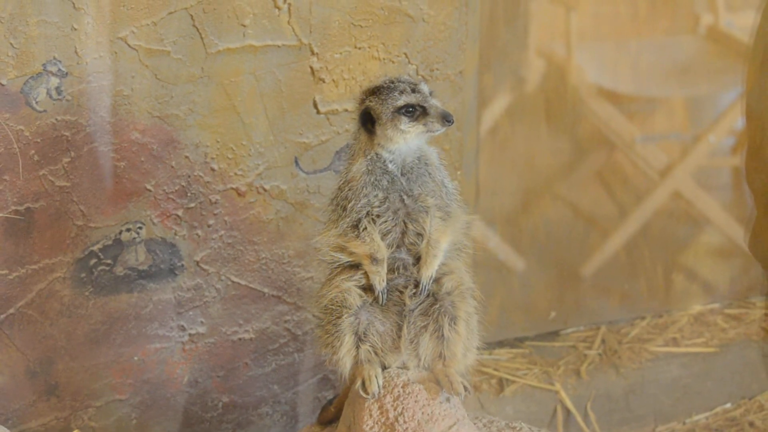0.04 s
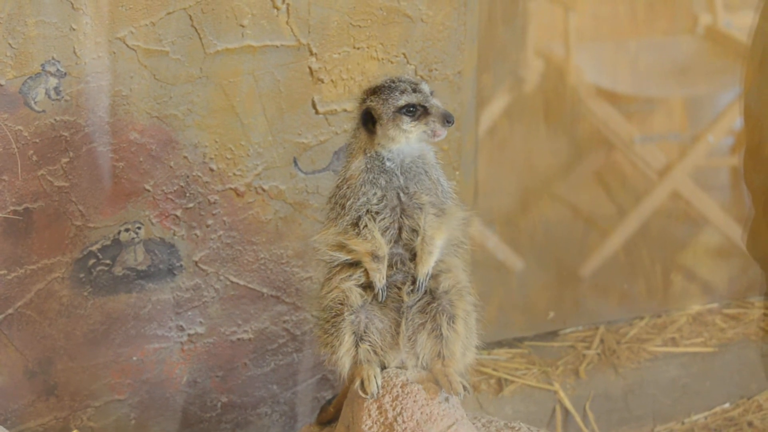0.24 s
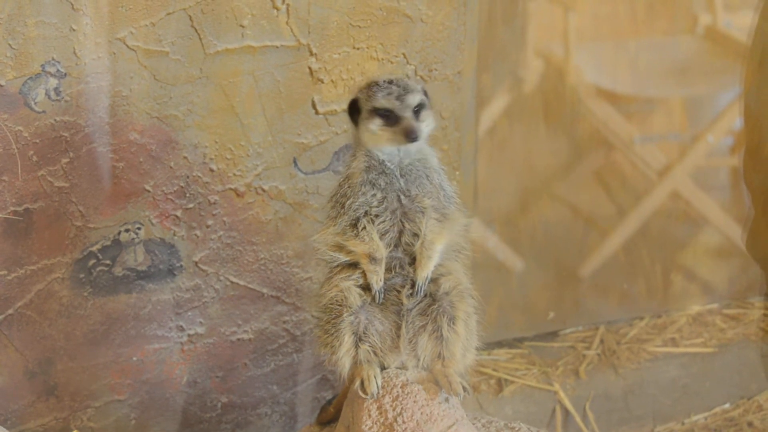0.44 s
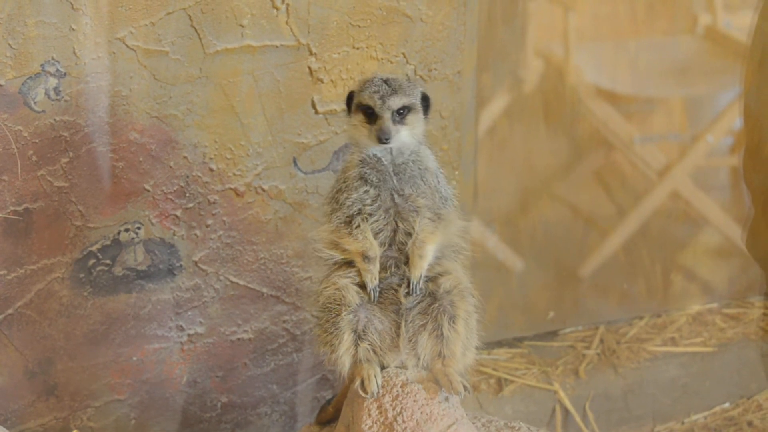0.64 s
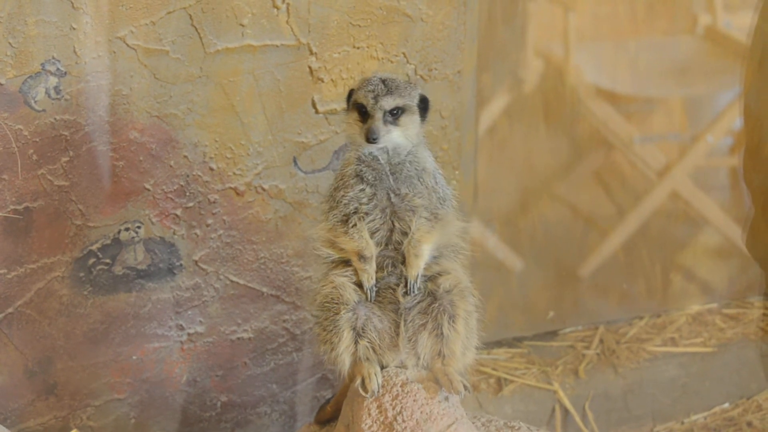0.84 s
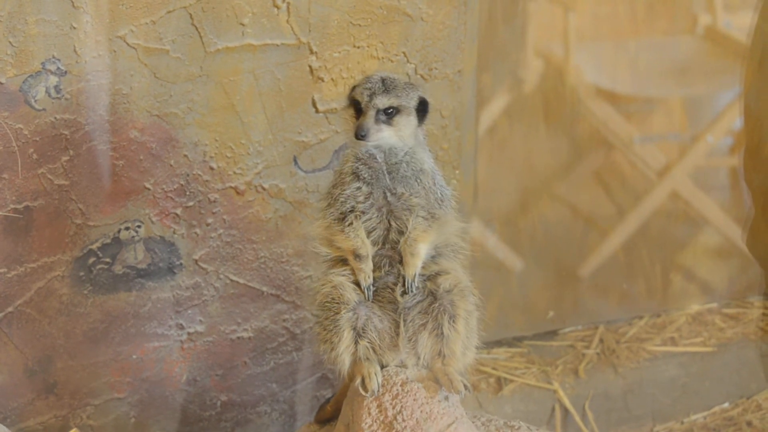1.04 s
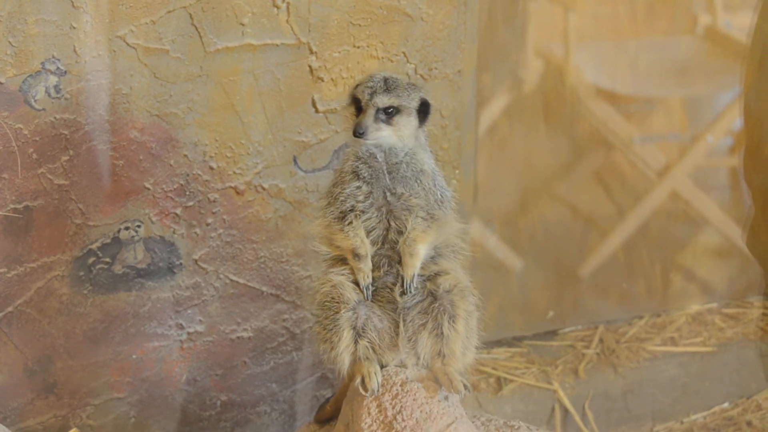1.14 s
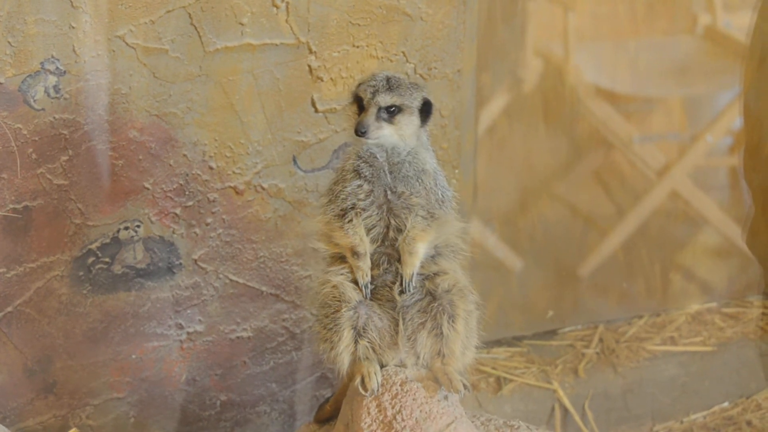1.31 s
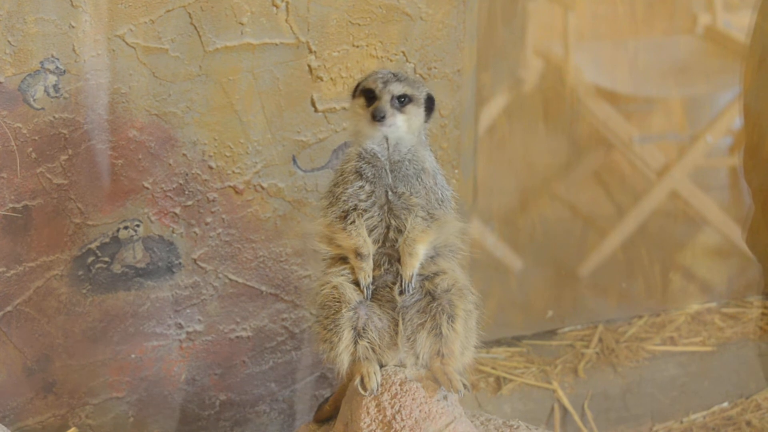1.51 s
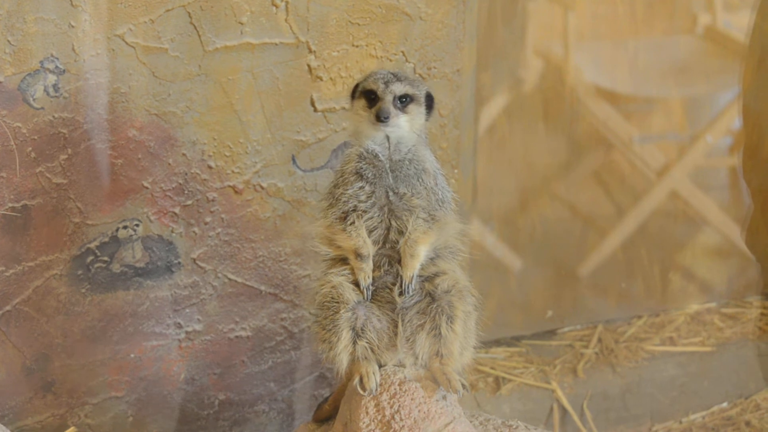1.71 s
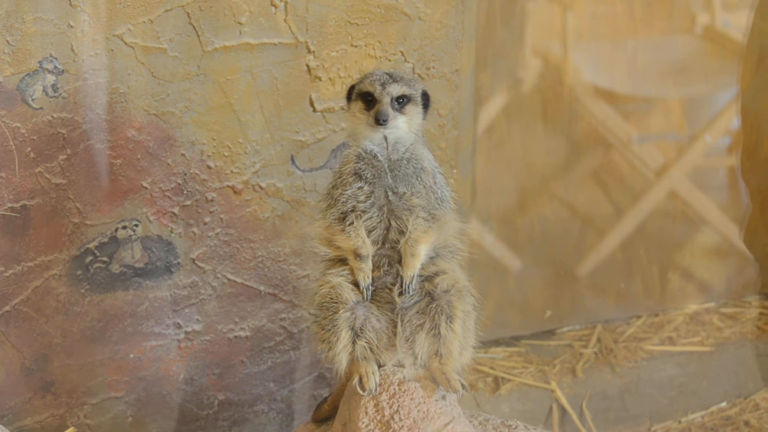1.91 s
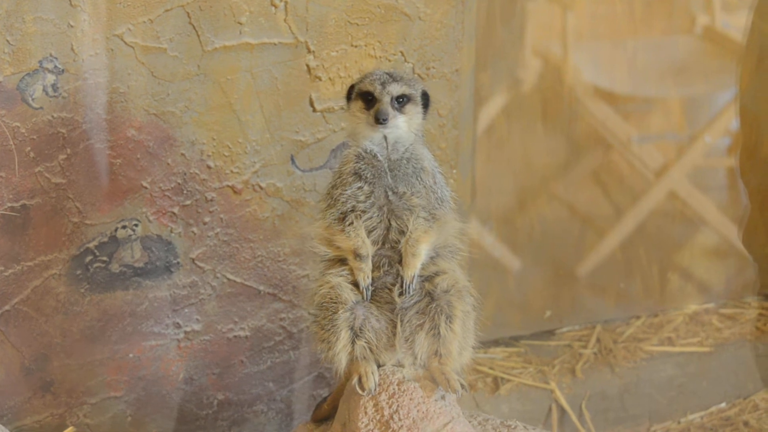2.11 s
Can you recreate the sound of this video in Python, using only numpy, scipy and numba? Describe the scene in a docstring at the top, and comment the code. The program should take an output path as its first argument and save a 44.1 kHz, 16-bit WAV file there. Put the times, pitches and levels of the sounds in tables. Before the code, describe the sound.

A meerkat gives two short, hoarse barks about a second apart, each echoing briefly off the hard walls of its enclosure. Faint air noise and a low hum continue underneath, and a tiny click falls in the second bark.

```python
"""Two hoarse barks ring out over steady air noise and a low, wavering hum.
A small animal, probably a meerkat, makes them: its vocal folds send uneven pulses and rasping air
through an opening mouth, so each bark grows from a low grunt into a yap with a ringing core.
The hard walls of its enclosure carry each bark on for half a second.
One tiny click falls in the second bark."""
import sys
import numpy as np
from scipy import signal
from scipy.fft import rfft, irfft
from scipy.io import wavfile
from scipy.ndimage import uniform_filter1d
from numba import njit

SR = 44100
rng = np.random.default_rng(int(sys.argv[2]) if len(sys.argv) > 2 else 0)


def dump_mix(stems):
    """Bounce the given channels to the path in sys.argv[1] as a 16-bit WAV at rate SR."""
    frames = np.atleast_2d(stems).T  # one column per channel
    limited = np.clip(frames, -1, 1)  # hard clip at full scale
    pcm = np.round(limited * 32767).astype(np.int16)
    wavfile.write(sys.argv[1], SR, pcm)


N = 94815


def undb(db):
    """Turn decibels into a number to multiply by."""
    return 10 ** (np.asarray(db) / 20)


def unit(x):
    """Scale a sound to an average strength (rms) of 1."""
    return x / np.sqrt(np.mean(x ** 2))


def drift(rate_hz):
    """A smooth random wobble, about 1 in size."""
    hold = int(SR / rate_hz)
    steps = np.repeat(rng.standard_normal(N // hold + 1), hold)
    return 1.326 * uniform_filter1d(uniform_filter1d(steps, hold), hold)[:N]


@njit
def band_pass(x, hz, width):
    """Let through the sound near a frequency that may move every sample."""
    y, band_state, low_state = np.empty(len(x)), 0., 0.
    for i in range(len(x)):
        tuning, damping = np.tan(np.pi * hz[i] / SR), width / hz[i]
        band = (band_state + tuning * (x[i] - low_state)) / (1 + tuning * (tuning + damping))
        band_state = 2 * band - band_state
        low_state += 2 * tuning * band
        y[i] = damping * band
    return y


def resonate(x, hz, width_hz):
    """Make a sound ring near one frequency: four filters of this width in a row, scaled to rms 1."""
    for _ in range(4):
        x = band_pass(x, hz * np.ones(N), float(width_hz))
    return unit(x)


def over_hz(points):
    """Join (frequency, value) points into a curve over the whole spectrum."""
    hz, value = np.array(points).T
    return np.interp(np.log(np.arange(N // 2 + 1) * SR / N + 1), np.log(hz), value)


# The tone color of the air noise: (frequency [Hz], relative level [dB])
AIR_COLOR = [(25, -9), (60, -14), (100, -3.5), (220, -3), (420, -5), (720, -3.5), (1200, -8.5),
             (1700, -9.5), (3000, -18), (5000, -29), (8000, -33.5), (15000, -37.5)]


def air(level_db=-62):
    """Steady air noise, strongest in the low notes."""
    spectrum = rfft(rng.standard_normal(N)) * undb(over_hz(AIR_COLOR))
    return undb(level_db) * unit(irfft(spectrum, N))


# How the rumble rises and falls: (time [s], level [dB])
RUMBLE_LEVELS = [(0, -83), (.25, -77), (.42, -68), (.65, -75.5), (.85, -76.5), (1.12, -65), (1.35, -70),
                 (2.15, -70)]


def rumble(t):
    """A soft, low noise that swells and fades."""
    level_db = np.interp(t, *np.array(RUMBLE_LEVELS).T)
    return undb(level_db) * resonate(rng.standard_normal(N), hz=260, width_hz=447)


# How the hum comes and goes: (time [s], level [dB])
HUM_LEVELS = [(0, -64), (.3, -67), (.5, -71), (.75, -84.5), (.88, -69), (1.08, -80.5), (1.22, -69),
              (1.38, -72.5), (1.48, -64.5), (1.88, -62.5), (2.15, -70)]


def hum(t, hz=105.2, waver=.008, flutter_db=1.1):
    """One low tone whose pitch and loudness waver a little."""
    pitch = hz * (1 + waver * drift(14))
    tone = unit(np.sin(2 * np.pi * np.cumsum(pitch) / SR))
    level_db = np.interp(t, *np.array(HUM_LEVELS).T) + flutter_db * drift(14)
    return undb(level_db) * tone


def whine(t, hz=15710, level_db=-90):
    """A very faint, very high, steady tone."""
    return undb(level_db) * unit(np.sin(2 * np.pi * hz * t))


def click(t, at_s=1.4233, level_db=-33, decay_s=.00016):
    """One dry tick: a sudden step that dies at once."""
    since = t - at_s
    return undb(level_db) * np.sign(since) * np.exp(-np.abs(since) / decay_s)


# How long the walls keep a sound going: (frequency [Hz], time to fade by 60 dB [s])
ECHO_TIMES = [(500, 0.24), (1100, 0.58), (1750, 0.58), (3000, 0.49), (10000, 0.24)]


def enclosure(t, x, direct_db=-2.5, echo_db=-6, build_s=.0034):
    """The direct sound plus dense echoes from hard walls; the middle frequencies last longest."""
    noise, tail = rfft(rng.standard_normal(N)), 0
    for band_hz, fade_s in ECHO_TIMES:
        share = over_hz([(hz, float(hz == band_hz)) for hz, _ in ECHO_TIMES])
        tail += irfft(noise * share, N) * undb(-60 * t / fade_s)
    tail *= 1 - np.exp(-t / build_s)
    tail /= np.sqrt(np.sum(tail ** 2))
    return undb(direct_db) * x + undb(echo_db) * signal.fftconvolve(x, tail)[:N]


def vocal_folds(pitch, timing_spread=.09, level_spread_db=.5, rasp=.75, puff_cycles=.87):
    """The vocal folds snap shut unevenly; each pulse comes with a puff of rasping air."""
    timing_chance, level_chance = rng.standard_normal((1500, 2)).T
    cycles = np.cumsum(pitch) / SR
    closures = np.cumsum(np.exp(timing_spread * timing_chance))  # counted in cycles
    at = np.searchsorted(cycles, closures[closures < cycles[-1]])
    pulses = np.zeros(N)
    pulses[at] = undb(-level_spread_db * level_chance[:len(at)])
    since_pulse = np.interp(cycles, closures, np.arange(len(closures))) % 1
    puffs = np.exp(-since_pulse / puff_cycles) * rng.standard_normal(N)
    return unit(pulses) + rasp * unit(puffs)


# Clear tones in the voice: (multiple of the pitch, level when open [dB], change when shut [dB])
CORE_TONES = [(3, -20.5, 21.5), (5, 6, -24.5), (7, -14, -21), (9, -20.5, -22)]


def ringing_core(pitch, shut, core_db, grunt_db, waver=.02):
    """Overtones that ring through the rasp; the strongest moves from third to fifth as the mouth opens."""
    phase = 2 * np.pi * np.cumsum(pitch * (1 + waver * drift(250))) / SR
    return sum(undb(core_db + open_db + (shut_db + grunt_db) * shut) * np.sin(multiple * phase)
               for multiple, open_db, shut_db in CORE_TONES)


# Resonances (bands where the mouth rings) that stay in place:
# (frequency [Hz], filter width [Hz], level when open [dB], change when shut [dB])
MOUTH_RESONANCES = [(690, 460, -26, 20), (1300, 720, -8, -7), (2500, 600, -15, -5), (7900, 1600, -47, -4),
                    (10600, 4200, -41.5, -4)]
# The shape of each bark: (time [s], level [dB], main throat resonance [Hz])
BARK_1 = [(.146, -64.5, 750), (.160, -50.5, 900), (.173, -54, 967), (.181, -44.5, 1055),
          (.189, -45.5, 1177), (.199, -47, 1390), (.209, -36.5, 1496), (.231, -39.5, 1620),
          (.238, -36.5, 1680), (.259, -32, 1680), (.271, -42.5, 1730), (.295, -60.5, 1680)]
BARK_2 = [(1.302, -69, 760), (1.328, -55, 860), (1.346, -54, 950), (1.363, -45.5, 980),
          (1.379, -46.5, 1210), (1.390, -39.5, 1560), (1.401, -41, 1633), (1.409, -35, 1698),
          (1.425, -39.5, 1620), (1.445, -47, 1626), (1.465, -70, 1670)]
# The two barks: (shape, upper resonance [Hz], its filter width [Hz], its level [dB],
# level of the ringing core [dB], change of the core in the opening grunt [dB])
BARKS = [(BARK_1, 2793, 650, -11.5, -1.8, -1), (BARK_2, 2996, 420, -11, -5, 3.7)]
THROAT_SHUT_HZ, THROAT_OPEN_HZ = 944, 1680  # main resonance with the mouth shut and wide open
PITCH_SHUT_HZ, PITCH_OPEN_HZ, OPEN_RISE_HZ_PER_S = 329.4, 336.3, 220
UPPER_SHUT_HZ, UPPER_SHUT_DB = -250, -8  # a shut mouth lowers and softens the upper resonance


def bark(t, shape, upper_hz, upper_width_hz, upper_db, core_db, grunt_db):
    """The mouth opens: the main resonance climbs and the higher ones come in, turning grunt into yap."""
    times, levels_db, resonances_hz = np.array(shape).T
    throat_hz = np.interp(t, times, resonances_hz)
    shut = np.clip((THROAT_OPEN_HZ - throat_hz) / (THROAT_OPEN_HZ - THROAT_SHUT_HZ), 0, 1)  # 0 = open
    muffled = shut ** 3  # the high sounds escape as soon as the lips part
    loud_center_s = np.average(times, weights=undb(levels_db) ** 2)
    from_center_s = np.clip(t, times[0], times[-1]) - loud_center_s
    open_pitch = PITCH_OPEN_HZ + OPEN_RISE_HZ_PER_S * from_center_s
    pitch = shut * PITCH_SHUT_HZ + (1 - shut) * open_pitch
    buzz = vocal_folds(pitch)
    voice = undb(-2.5) * resonate(buzz, throat_hz, width_hz=604)
    upper = resonate(buzz, upper_hz + UPPER_SHUT_HZ * shut, upper_width_hz)
    voice += undb(upper_db + UPPER_SHUT_DB * muffled) * upper
    for hz, width_hz, open_db, shut_db in MOUTH_RESONANCES:
        voice += undb(open_db + shut_db * shut) * resonate(buzz, hz, width_hz)
    voice += ringing_core(pitch, shut, core_db, grunt_db)
    sounding = (t > times[0]) & (t < times[-1])
    return voice * undb(np.interp(t, times, levels_db)) * sounding


def scene():
    """Two echoing barks, the background and the click, in one channel."""
    t = np.arange(N) / SR
    barks = sum(bark(t, *row) for row in BARKS)
    return (enclosure(t, barks) + air() + rumble(t) + hum(t) + whine(t) + click(t))[None]


def record(dry):
    """The recorder cuts off the very highest sounds."""
    top_hz = 15850
    return signal.sosfilt(signal.ellip(10, .2, 70, top_hz, fs=SR, output="sos"), dry)


dry = scene()
out = record(dry)
dump_mix(out)
```